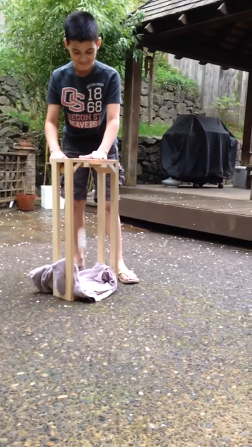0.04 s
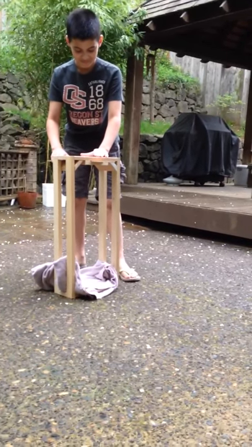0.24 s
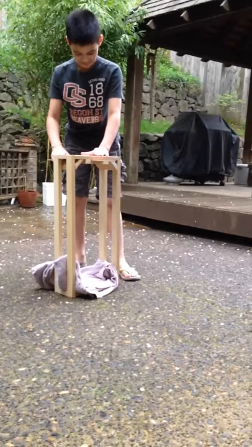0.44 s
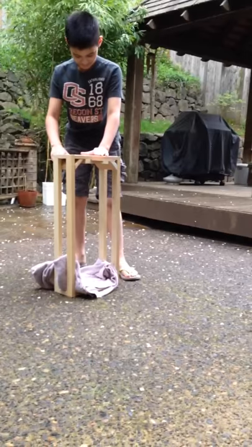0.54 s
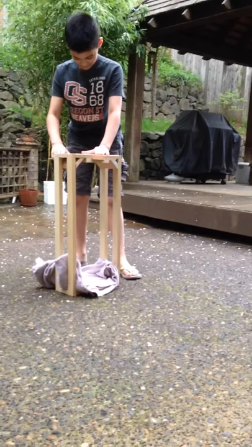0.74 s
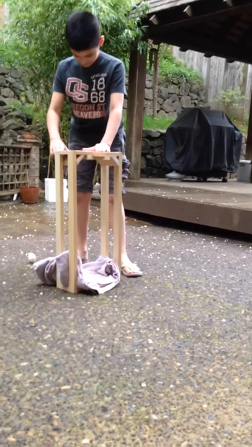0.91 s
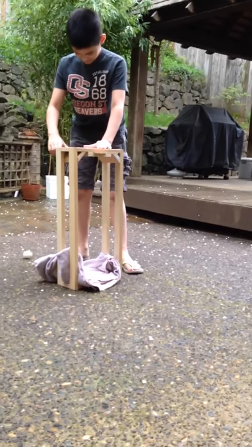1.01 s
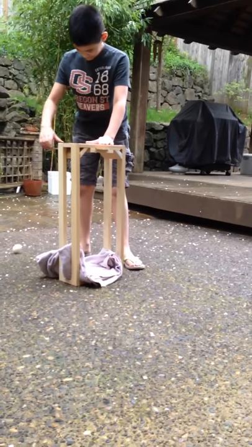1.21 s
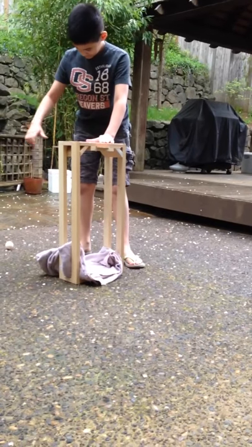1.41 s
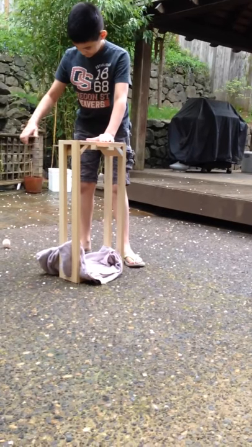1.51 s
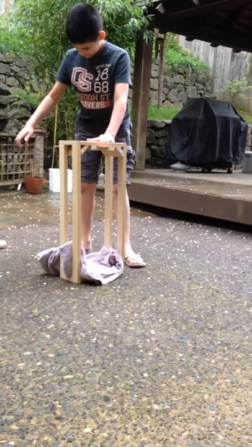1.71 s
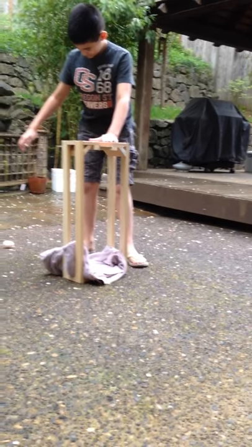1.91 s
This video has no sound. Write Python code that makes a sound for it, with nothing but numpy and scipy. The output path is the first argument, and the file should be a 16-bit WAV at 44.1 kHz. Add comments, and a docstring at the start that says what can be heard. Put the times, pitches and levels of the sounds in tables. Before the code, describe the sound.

An egg lands on a towel inside a wooden frame at about 0.2 seconds, making one hollow, cushioned thud, the loudest sound. From 0.5 to 1 second it bounces four times on patio stones with quieter, gritty shell crunches. It then rolls over pebbles, ticking irregularly and grinding softly until about 2 seconds, with short yard reflections. Throughout, a faint low drone swells and fades over quiet outdoor air.

```python
"""Over faint outdoor air a low drone swells and fades throughout. An egg drops into a towel at the
foot of a wooden frame: the cloth slaps and the padded frame rings with one hollow thud. The egg hops
out and bounces four times on the patio stones, gritty contacts shaking its shell into a crunch.
It rolls away, ticking and grinding over the pebbles, and the yard answers with short reflections."""
import sys
import numpy as np
from scipy import signal
from scipy.fft import rfft, irfft
from scipy.io import wavfile

SR = 44100
rng = np.random.default_rng(int(sys.argv[2]) if len(sys.argv) > 2 else 0)


def dump_mix(stems):
    """Bounce the given channels to the path in sys.argv[1] as a 16-bit WAV at rate SR."""
    frames = np.atleast_2d(stems).T  # one column per channel
    limited = np.clip(frames, -1, 1)  # hard clip at full scale
    pcm = np.round(limited * 32767).astype(np.int16)
    wavfile.write(sys.argv[1], SR, pcm)


N = 85995
T = np.arange(N) / SR
CONTACT_SAMPLES, CONTACT_GAIN = 8000, np.sqrt(0.008 * SR)   # gain: unit energy to rms 1 over 8 ms
GRITS_PER_S, GRIT_T60_S = 4500, 0.029
YARD_BUILD_S = 0.0034


# towel gives way, egg bottoms out: t/s, level/dB
PUSHES = [(0.2333, -10.5), (0.2372, -19.5)]
# frame modes: f/Hz, level/dB re push, t60/s
FRAME_MODES = [(136, -4, 0.037), (310, -17, 0.043), (526, 5.5, 0.034), (706, -7.5, 0.036),
               (960, -19.5, 0.049), (1166, -57, 0.45), (1283, -2, 0.018), (1520, -26, .025),
               (1550, -7, 0.054), (1590, -42, 0.48), (2030, -22, 0.017), (2443, -19.5, 0.054),
               (2810, -43, 0.023)]
# wash round frame and yard: f/Hz, relative density/dB
WASH_SPECTRUM = [(50, -27), (140, -2), (240, -18), (380, -12), (490, 7), (680, -2), (950, -10), (1250, -1),
                 (1600, -13), (2200, -18), (4000, -35.5), (10000, -57)]
# late tail of the wash: f/Hz, relative density/dB
TAIL_SPECTRUM = [(250, -15), (510, 7.5), (850, -6), (1120, 9), (1300, -2.5), (1550, 1), (1900, -10),
                 (4000, -44)]

def thud(rise_s=0.00067, slap_rise_s=0.0028):
    """Two quick, cushioned pushes ring the padded frame; the cloth slaps and the yard rings on."""
    frame = np.zeros(N)
    for start_s, push_db in PUSHES:
        t = T - start_s
        for hz, db, t60 in FRAME_MODES:
            frame += from_db(push_db + db) * rise(t, rise_s) * fade(t, t60) * np.sin(2 * np.pi * hz * t)
    frame = butter(butter(frame, 5800, "low"), 109, "high", order=3)
    t = T - PUSHES[0][0]
    slap = unit(butter(rng.standard_normal(N), [515, 2060], "band")) * np.sqrt(N)
    slap *= from_db(-23) * rise(t, slap_rise_s) * fade(np.maximum(t - slap_rise_s, 0), t60_s=0.031)
    wash = from_db(-22.5) * noise(WASH_SPECTRUM) * fade(t, t60_s=0.19)
    tail = from_db(-44) * noise(TAIL_SPECTRUM) * fade(t, t60_s=0.81)
    return frame + slap + (wash + tail) * rise(t, YARD_BUILD_S)


# egg resonances: f/Hz, width/Hz, level/dB
SHELL_MODES = [(789, 118, 8), (1347, 170, 1.5), (1666, 190, 5.5), (2055, 260, 1.5), (2325, 355, 0.5),
               (3590, 900, -3), (4045, 750, 0.5), (4820, 1200, -1), (5870, 1700, 0), (7730, 2060, 0),
               (9440, 2100, -2), (14000, 3500, -12)]

def shell(force):
    """A force drives the egg's resonances in parallel, alternating in sign."""
    return sum((-1) ** k * from_db(db) * resonate(force, hz, width_hz)
               for k, (hz, width_hz, db) in enumerate(SHELL_MODES))


# contact bands (knock, shell ring, snap, crackle): low f/Hz, high f/Hz
CONTACT_BANDS = [(550, 1100), (1100, 2700), (2900, 5300), (5500, 14500)]

def contact(bands_db, crumble_db=-10, grit_db=6):
    """A click, a burst of grit and a crumbling tail shake the shell; the egg's weight adds a bump."""
    t = T[:CONTACT_SAMPLES]
    burst = grit(GRITS_PER_S, len(t)) * fade(t, GRIT_T60_S) * rise(t, rise_s=0.00083)
    crumble = grit(GRITS_PER_S, len(t)) * fade(t, t60_s=0.21)
    force = from_db(grit_db) * unit(burst)
    force[0] += 1   # click
    force = unit(force) + from_db(crumble_db) * unit(crumble)
    ring = shell(force)
    crunch = sum(from_db(db) * unit(butter(ring, band_hz, "band", order=3))
                 for band_hz, db in zip(CONTACT_BANDS, bands_db))
    bump = from_db(max(bands_db[:2]) - 6) * unit(butter(force, [137, 450], "band"))
    return CONTACT_GAIN * (crunch + bump)


def ping(hz):
    """The struck patch of shell rings in a narrow band."""
    force = unit(grit(GRITS_PER_S, CONTACT_SAMPLES) * fade(T[:CONTACT_SAMPLES], GRIT_T60_S))
    force[0] += 1
    width_hz = 0.11 * hz
    ring = resonate(force, hz, width_hz)
    return CONTACT_GAIN * unit(resonate(ring, hz, 3 * width_hz))


# hits on stone: t/s, level/dB, 4 bands/dB re level, crumble/dB re hit, grit/dB re click, ping f/Hz
STONE_HITS = [(0.4909, -31.5, -9, -20.5, -8, -6, -4, 8, 6060),
              (0.6202, -36, -10, -8.5, -9, -7, -17, 1, 1630),
              (0.7396, -36, -11.5, -5.5, -15, -12.5, -4, 12, 2440),
              (0.9465, -39, -15.5, -4.5, -6, -5, -8.5, 5, 3840)]
# light touch before the second bounce: t/s, 4 band levels/dB
GRAZE_TOUCH = (0.6143, -52.5, -46.5, -77, -57)

def bounces(boom_hz=158.8):
    """Each bounce crunches and pings the shell and wakes a low ring."""
    out = np.zeros(N)
    t = T[:CONTACT_SAMPLES]
    boom = fade(t, t60_s=0.32) * np.sin(2 * np.pi * boom_hz * t)
    for start_s, db, *bands_db, crumble_db, grit_db, ping_hz in STONE_HITS:
        add(out, start_s, contact(db + np.array(bands_db), crumble_db, grit_db))
        add(out, start_s, from_db(db - 8.5) * ping(ping_hz) + from_db(db - 16) * boom)
    add(out, GRAZE_TOUCH[0], contact(GRAZE_TOUCH[1:]))
    return out


# pebble contacts, before trim: t/s, level/dB, 4 bands/dB re level
PEBBLE_HITS = [(0.5046, -30.5, -32, -22.5, -22, -11), (0.7663, -40.5, -11.5, -19, -14, -13.5),
               (0.833, -41, -10.5, -12, -17, -15.5), (0.8702, -43, -19, -28, -16, -12.5),
               (0.9848, -47.5, -5, -17, -17, -17), (1.0071, -53.5, -5, -8.5, -28, -29),
               (1.0274, -50.5, -22, -8, -16, -23), (1.1161, -31, -18, -24, -26, -23),
               (1.1388, -42, -9.5, -13, -14.5, -19), (1.1502, -42, -17, -28, -13.5, -15.5),
               (1.2252, -47.5, -21, -19, -20, -20), (1.271, -46, -17.5, -17, -12.5, -15.5),
               (1.3023, -39.5, -18, -14.5, -16.5, -18), (1.3433, -43.5, -17, -15, -15, -21),
               (1.3702, -41.5, -31, -11.5, -14.5, -21), (1.3991, -41.5, -30, -14, -14.5, -17.5),
               (1.42, -40.5, -23, -14.5, -18, -19.5), (1.4407, -42.5, -26, -16.5, -19, -19),
               (1.4892, -39.5, -18.5, -16, -20, -22), (1.508, -44.5, -13.5, -9.5, -16, -15),
               (1.5284, -37.5, -39, -26.5, -20.5, -16.5), (1.6171, -41.5, -20, -17, -14, -15),
               (1.707, -50.5, -14.5, -12.5, -14, -15), (1.7408, -39, -18.5, -17.5, -17, -21.5),
               (1.843, -55, -9, -10, -10.5, -24), (1.9256, -47.5, -16, -13.5, -12, -17.5)]
# trim: 4 bands/dB
BAND_TRIM_DB = [0, 1.05, 0.57, 0.8]

def ticks():
    """The rolling egg knocks on pebbles; each weights the bands anew."""
    out = np.zeros(N)
    for start_s, db, *bands_db in PEBBLE_HITS:
        add(out, start_s, contact(db + np.array(bands_db) + BAND_TRIM_DB))
    return out


# grinding envelope: t/s, level/dB
GRIND_LEVELS = [(0.5, -57.5), (0.6, -66), (0.8, -72.5), (0.92, -81), (1.02, -70.5), (1.09, -68),
                (1.17, -62.5), (1.25, -72), (1.3, -62), (1.45, -78), (1.52, -71), (1.6, -79), (1.68, -71),
                (1.76, -63), (1.89, -77), (1.94, -58.5)]

def grinding(grits_per_s=2700, rumble_hz=362):
    """From the first bounce on, fine grit rasps the shell over a low rumble."""
    grains = grit(grits_per_s, N)
    rasp = unit(butter(shell(grains), 7400, "low", order=1))
    rumble = from_db(-1.5) * unit(butter(grains, [rumble_hz / 2, rumble_hz * 1.28], "band"))
    envelope = from_db(np.interp(T, *np.transpose(GRIND_LEVELS))) * (T > STONE_HITS[0][0])
    return np.sqrt(N) * envelope * (rasp + rumble)


def yard(x):
    """Deck, wall and fence return short diffuse reflections."""
    t = T[:SR // 2]
    echoes = butter(rng.standard_normal(len(t)), 16500, "low", order=1)
    echoes *= fade(t, t60_s=0.11) * rise(t, YARD_BUILD_S)
    return from_db(-12) * signal.fftconvolve(x, unit(echoes))[:N]


# drone course: t/s, relative level/dB, f/Hz
DRONE_COURSE = [(0.0, -45.5, 60), (0.092, -52.5, 62.2), (0.124, -59, 64.5), (0.178, -46.5, 59.9),
                (0.282, -40.5, 62.1), (0.406, -62.5, 59.6), (0.46, -47, 59.3), (0.526, -47, 56.5),
                (0.656, -56, 56.4), (0.776, -47, 57.3), (0.944, -46, 56.7), (1.124, -59.5, 56.6),
                (1.14, -63, 57), (1.444, -45, 55.15), (1.716, -46.5, 56.2), (1.95, -55, 53.5)]

def drone():
    """A low tone, perhaps a far engine, sags in pitch as it swells and fades; its octave wavers."""
    times_s, db, hz = np.transpose(DRONE_COURSE)
    phase = 2 * np.pi * np.cumsum(np.interp(T, times_s, hz)) / SR
    waver = 1 + 0.77 * noise([(1, 11), (12, -2), (60, -83), (200, -120)])
    octave = from_db(-22.5) * waver * np.sin(2 * phase)
    envelope = np.sqrt(2) * from_db(np.interp(T, times_s, db) + 0.5)
    return envelope * (np.sin(phase) + octave)


# outdoor air: f/Hz, relative density/dB
AIR_SPECTRUM = [(53, -51), (90, 0), (130, -7.5), (294, -24), (743, -27), (1030, -19), (1250, -25.5),
                (1690, -31.5), (2280, -31), (2890, -33), (14500, -42.5), (15500, -55)]

def air():
    """Faint, steady outdoor noise, mostly low."""
    return from_db(-57.5) * butter(noise(AIR_SPECTRUM), 55, "high")


def from_db(db):
    """Decibels to gain."""
    return 10 ** (np.asarray(db) / 20)


def unit(x):
    """Scale to energy 1."""
    return x / np.sqrt(np.sum(x ** 2) + 1e-20)


def rise(t, rise_s):
    """Linear ramp, 0 to 1."""
    return np.clip(t / rise_s, 0, 1)


def fade(t, t60_s):
    """Exponential decay from t = 0."""
    return (t >= 0) * np.exp(-np.log(1000) * np.maximum(t, 0) / t60_s)


def butter(x, hz, kind, order=2):
    """Butterworth filter."""
    return signal.sosfilt(signal.butter(order, hz, kind, fs=SR, output="sos"), x + 1e-18)


def resonate(x, hz, width_hz):
    """Two-pole resonance, peak gain 1."""
    r = np.exp(-np.pi * width_hz / SR)
    feedback = [1, -2 * r * np.cos(2 * np.pi * hz / SR), r * r]
    return signal.lfilter(np.array([1, 0, -1]) * (1 - r * r) / 2, feedback, x + 1e-18)


def noise(spectrum):
    """Noise shaped by (f/Hz, level/dB) rows, rms 1."""
    hz, db = np.transpose(spectrum)
    bins_hz = np.arange(N // 2 + 1) * SR / N
    gain = from_db(np.interp(np.log(bins_hz + 1), np.log(hz), db))
    return unit(irfft(rfft(rng.standard_normal(N)) * gain, N)) * np.sqrt(N)


def grit(per_s, size):
    """Tiny touches: random clicks of uneven strength."""
    return (rng.random(size) < per_s / SR) * rng.standard_normal(size)


def add(out, start_s, x):
    """Mix x in at start_s."""
    i = int(start_s * SR)
    out[i:i + len(x)] += x[:N - i]


def scene():
    """Landing, egg with its reflections, drone and air; mono."""
    egg = grinding() + bounces() + ticks()
    return (thud() + egg + yard(egg) + drone() + air())[None]


def record(dry):
    """Steep low-pass at 15.8 kHz."""
    return signal.sosfilt(signal.ellip(10, .2, 80, 15800, fs=SR, output="sos"), dry)


dry = scene()
out = record(dry)
dump_mix(out)
```